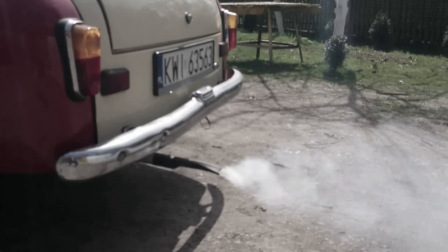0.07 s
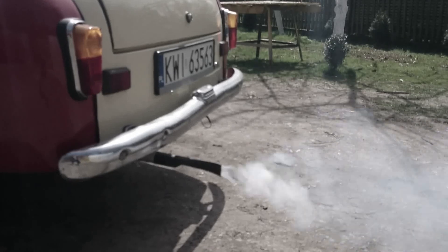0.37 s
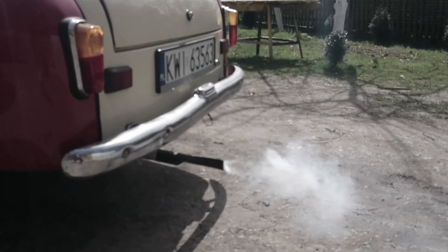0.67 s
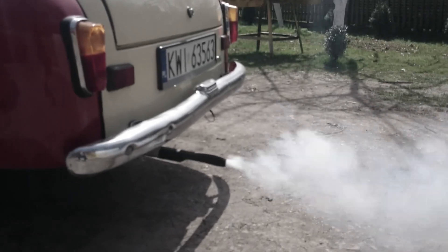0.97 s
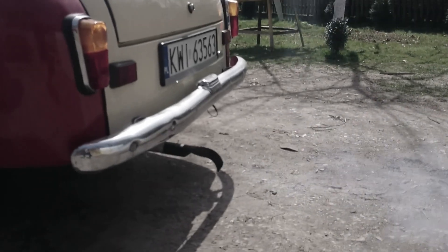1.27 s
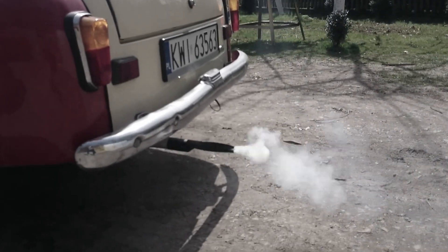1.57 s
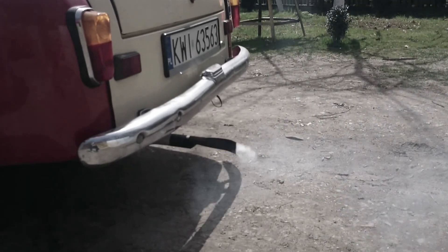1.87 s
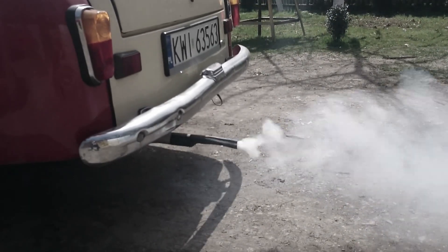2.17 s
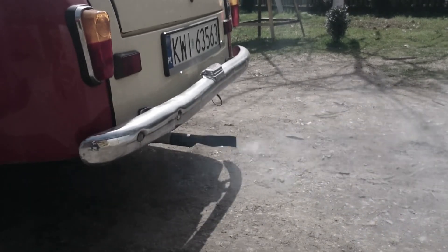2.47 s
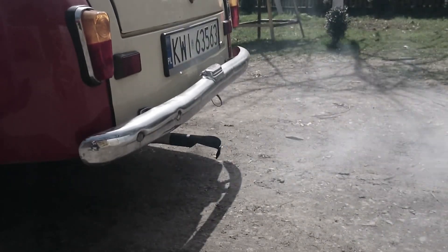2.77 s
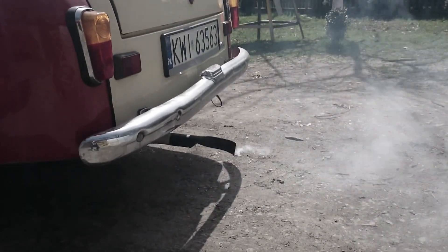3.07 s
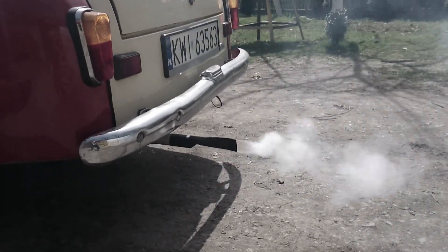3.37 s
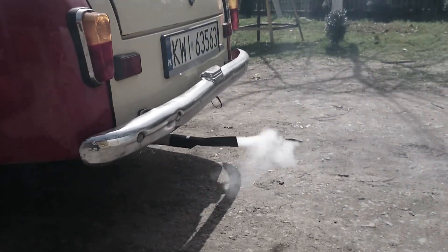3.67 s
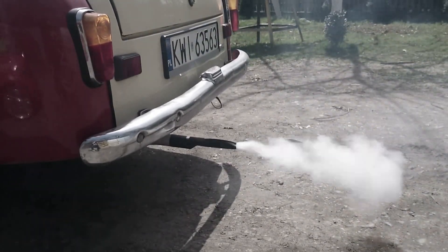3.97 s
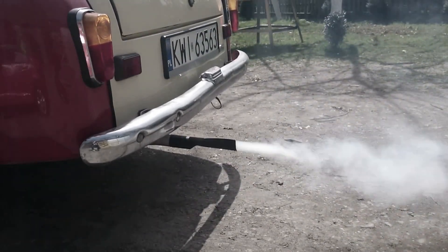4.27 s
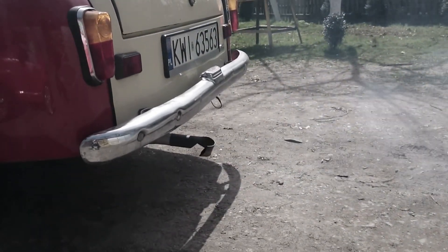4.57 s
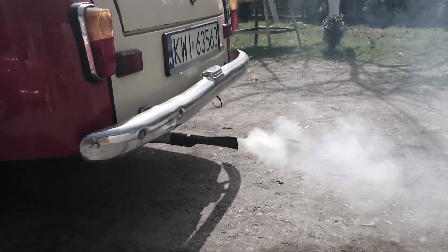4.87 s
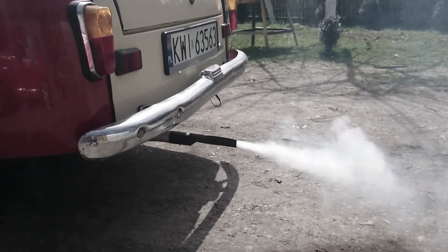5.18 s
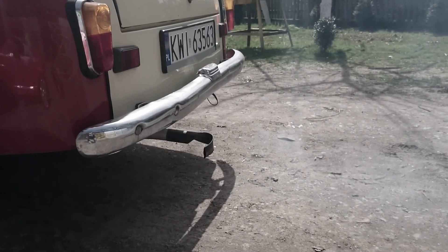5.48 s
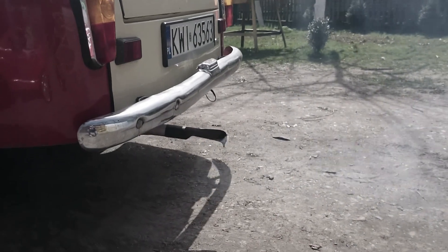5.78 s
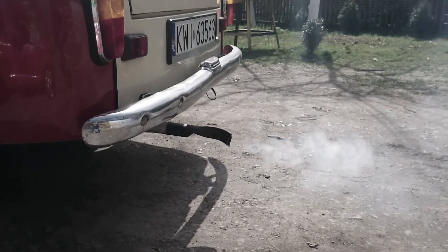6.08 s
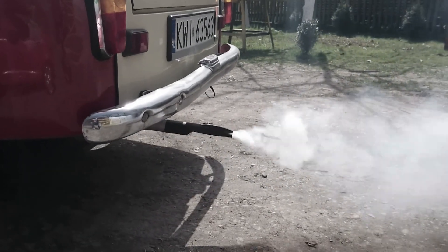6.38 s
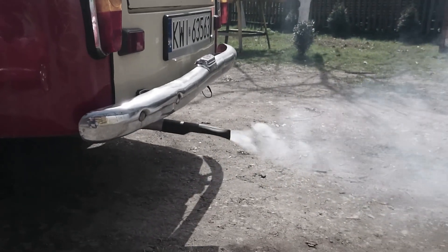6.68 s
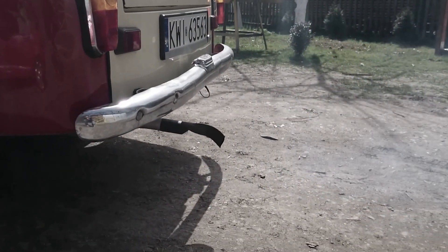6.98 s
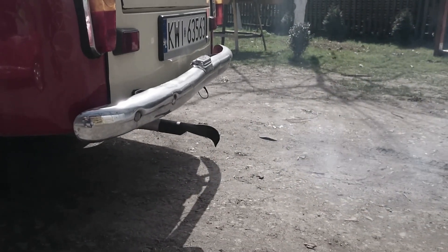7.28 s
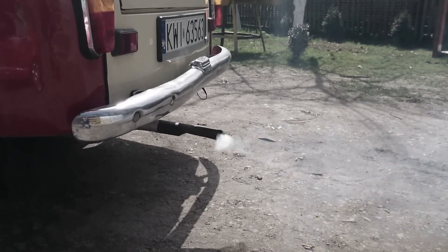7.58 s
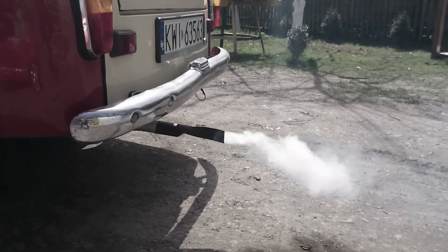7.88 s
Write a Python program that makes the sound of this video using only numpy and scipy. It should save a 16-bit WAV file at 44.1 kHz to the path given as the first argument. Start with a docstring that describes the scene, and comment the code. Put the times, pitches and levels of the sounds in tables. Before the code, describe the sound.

Close to a tailpipe outdoors, exhaust barks and splutters through a loose rubber tube that flaps, cracks and squeaks. Underneath, an old car engine drones and rattles, speeding up slightly five times and sagging after each. The sputtering comes in irregular clusters, thickest in the middle, where a breathy whistle glides upward, and again near the end with a short howl. A light wind rumbles on the microphone, and there is almost no echo.

```python
"""In a yard, an old car runs with a soft rubber tube pushed over its tailpipe; the sound fades in.
Each irregular firing drives a pulse of gas through the tube: pipe and tube resonate with a thump and
a bark, the jet hisses, and the rubber slaps, crackles and squeaks. The throttle is blipped five times
and the engine coasts down in between, its harmonic drone and rattle following the crank speed.
A hoot, three howls and a rising whistle join in, over the low rumble of a breeze."""
import sys
import numpy as np
from scipy import signal
from scipy.fft import rfft, irfft
from scipy.io import wavfile

SR = 44100
rng = np.random.default_rng(int(sys.argv[2]) if len(sys.argv) > 2 else 0)


def master_out(mix):
    """Clip the mix to full scale and print it as 16-bit PCM to the path in sys.argv[1]."""
    frames = np.transpose(np.atleast_2d(mix))
    ceiling = np.clip(frames, -1, 1)
    pcm = np.round(ceiling * 32767).astype(np.int16)
    wavfile.write(sys.argv[1], SR, pcm)


N = 350154
TIME, BINS = np.arange(N) / SR, np.fft.rfftfreq(N, 1 / SR)

# firings that blow the tube open until its loose end claps:
# (clap time [s], puff length [s], puff level [dB], clap level [dB])
FIRINGS = [(0.904, 0.034, -22, -5.5), (1.002, 0.054, -22.5, -2), (1.1043, 0.12, -24.5, -6.5),
           (1.152, 0.02, -17.5, 0), (1.1983, 0.02, -20.5, -5), (1.252, 0.04, -24.5, -11),
           (1.615, 0.068, -31, -49), (1.6855, 0.036, -22, -24), (1.855, 0.031, -30.5, -19),
           (2.152, 0.12, -24.5, -31), (2.2082, 0.062, -16.5, -6.5), (2.255, 0.035, -15, -5),
           (2.2768, 0.014, -34, 0), (2.38, 0.042, -23.5, -54), (2.421, 0.02, -26, -19),
           (2.5408, 0.053, -29, -14.5), (2.6697, 0.012, -33, -18.5), (2.76, 0.034, -34, -33),
           (3.047, 0.03, -27.5, -47), (3.1004, 0.014, -22, -16), (3.1566, 0.044, -22, -10),
           (3.482, 0.018, -26.5, -18), (3.608, 0.049, -34.5, -20), (3.653, 0.067, -28.5, -23),
           (3.794, 0.027, -33.5, -11), (3.9728, 0.035, -45, -18), (4.1148, 0.047, -18.5, -9),
           (4.14, 0.072, -18.5, -13), (4.18, 0.12, -19, -2), (4.235, 0.056, -17.5, -19),
           (4.2805, 0.025, -16, -2.5), (4.3161, 0.01, -31, -4.5), (4.447, 0.052, -32.5, -29),
           (4.5105, 0.052, -17, -4.5), (4.545, .035, -21.5, -19), (4.68, 0.014, -31, -17),
           (4.829, 0.069, -21.5, -34), (4.895, 0.062, -26, -48), (4.9326, .04, -25, -23),
           (4.9948, 0.064, -16.5, -11), (5.057, 0.076, -22, -18.5), (5.1332, .03, -20.5, -13),
           (5.1907, 0.076, -21, -16), (5.262, 0.063, -23, -33), (5.3014, 0.094, -21.5, -33),
           (5.383, 0.04, -17.5, -18), (5.4484, 0.019, -20, -13.5), (5.533, 0.019, -23, -41),
           (5.726, 0.04, -35, -50), (5.916, 0.022, -24.5, -38), (5.965, 0.014, -23.5, -21),
           (6.292, 0.014, -28, -24), (6.375, .033, -21, -10.5), (6.4343, 0.042, -25, -18.5),
           (6.469, 0.087, -18.5, -27), (6.49, .015, -31, -6), (6.5454, 0.051, -17, -28),
           (6.608, 0.07, -12, -13), (6.6638, 0.037, -15.5, -8.5), (6.6973, 0.022, -17.5, -7.5),
           (6.751, 0.07, -18, -8.5), (6.841, 0.0099, -22, -14), (6.9027, 0.044, -26.5, -11.5),
           (6.9725, 0.029, -26.5, -12), (7.157, 0.031, -21.5, -24), (7.272, 0.046, -24.5, -68),
           (7.461, .03, -29.5, -26), (7.562, 0.029, -22.5, -23), (7.7032, 0.034, -20, -19)]
# sharp pops that ring the tube: (time [s], level [dB])
POP_EVENTS = [(2.147, -12), (2.276, 2), (2.37, -20), (3.098, -10), (3.152, -2), (4.113, -13), (4.315, 1),
              (4.832, -13), (5.132, -15), (5.383, -11), (5.445, -12), (5.986, -7), (6.356, -3.5),
              (6.9, -23), (7.178, -5.5), (7.694, -9)]
# gas squeezing between the rubber lips, plus a short knock near 2 kHz at 7.18 s, played the same way: (time
# [s], starting pitch [Hz], level [dB])
SQUEAK_EVENTS = [(1.293, 2980, -2.5), (1.319, 3250, -11.5), (2.5609, 3000, -11), (3.624, 3210, -11.5),
                 (4.43, 3540, -17.5), (4.62, 3200, -18), (4.678, 2670, -26), (5.132, 3500, -9),
                 (5.987, 2800, -14), (6.306, 3180, -22), (7.178, 2070, -11.5)]
# howls of the pipe at wide throttle: (start [s], end [s], pitch [Hz], level [dB])
HOWL_EVENTS = [(2.168, 2.35, 322, -29), (4.07, 4.34, 375, -19), (6.57, 6.937, 368.3, -19.5)]
# course of the whistle: (time [s], pitch [Hz], level [dB])
WHISTLE_GLIDE = [(3.7, 701.7, -47), (3.85, 791.6, -30.5), (3.95, 905, -26.5), (4.05, 958, -23.5),
                 (4.2, 983, -21.5), (4.35, 1072, -34), (4.48, 1180, -25), (4.6, 1218, -50)]
# resonances of the exhaust pipe and the inflated tube: (frequency [Hz], bandwidth [Hz], level [dB])
PIPE_MODES = [(172, 18, -4), (444, 20, 5), (678, 35, 1)]
TUBE_MODES = [(1254, 220, 5.5), (1590, 130, -2), (1722, 55, 10.5), (1812, 63, -0.5)]
# throttle blips: (start [s], end [s], crank speed reached [Hz], deceleration afterwards [Hz/s])
THROTTLE_BLIPS = [(1.0, 1.27, 59.22, 6.97), (2.07, 2.25, 55.3, 7.39), (4.09, 4.42, 51.7, 7.0),
                  (4.88, 5.31, 56.61, 7.77), (6.51, 6.83, 59.77, 6.04)]
# harmonics 1, 2, 3, ... of the crank speed: (relative level [dB])
ENGINE_HARMONICS = [0, 1.5, -2.5, -9.5, -10, -4.5, -9.5, -9.5, -12, -12, -17.5, -14, -16, -11, -17, -13]
# strength of the rattle at CRUISE_HZ: (time [s], level [dB])
RATTLE_COURSE = [(1.3, -29), (3.5, -27.5), (3.8, -23), (5.5, -25.5), (6.2, -27), (7.4, -25.5), (7.9, -27.5)]
# gusts of the breeze: (peak time [s], half length [s], level [dB])
BREEZE_GUSTS = [(2.55, 0.2, -29.5), (3.06, 0.088, -25), (4.968, 0.16, -30.5), (6.203, 0.14, -48),
                (7.402, 0.38, -38)]
# spectral shapes of the sources: (frequency [Hz], relative spectral density [dB])
THUMP_SPECTRUM = [(20, -22), (40, -10), (65, 1), (110, 1), (170, -5), (240, -9), (400, -11), (600, -20),
                  (750, -16), (1100, -35), (3000, -70)]
BARK_SPECTRUM = [(120, -26), (230, -7.5), (300, 4.5), (410, 5.5), (570, -13), (750, 0), (1000, -4.5),
                 (1300, 0.5), (2000, 2.5), (2600, -3.5), (3600, -5.5), (4500, -26.5), (8000, -14.5),
                 (15000, -46.5)]
HISS_SPECTRUM = [(800, -26), (2000, 7), (3400, -5), (4400, 2.5), (6200, 2.5), (8000, 4.5), (9600, 2.5),
                 (11000, -7.5), (13500, -4), (16000, -17)]
CRACK_SPECTRUM = [(300, -25), (900, -17), (1700, -10), (2500, -1.5), (3500, 1), (4500, -6.5), (6200, -3),
                  (9500, -5.5), (11000, -18), (16000, -20)]
RUMBLE_SPECTRUM = [(20, -32), (40, -12), (62, -11.5), (110, -3.5), (170, -3), (230, -20), (340, -13.5),
                   (440, -10), (580, -14.5), (730, -7), (950, -17), (1500, -48)]
RATTLE_SPECTRUM = [(300, -22.5), (600, -19.5), (760, -8), (1000, 0), (1250, 1.5), (1450, 4), (1700, 6.5),
                   (2100, 0.5), (2700, -1), (3400, -9), (4400, -12), (6500, -13.5), (9300, -16.5),
                   (11000, -29), (15500, -40)]
BREEZE_SPECTRUM = [(15, -25), (35, -16.5), (65, 8.5), (110, 3), (200, -3.5), (400, -28.5), (1200, -53)]
# share of the sound scattered by the yard: (frequency [Hz], gain [dB])
YARD_SCATTER = [(60, -32), (500, -26), (800, -19), (1400, -13), (3000, -10), (15000, -10)]
# gain at the centre of a treble band: (time [s], gain [dB])
PRESENCE_GAIN = [(1, -4), (4.4, -6.5), (4.9, -1), (7.5, 5)]
# left microphone relative to the right: (frequency [Hz], level difference [dB])
MIC_BALANCE = [(60, 0.5), (92, -3.5), (140, -2), (210, -3), (330, -5.5), (500, -6), (770, -7), (1170, -10),
               (1790, -14.5), (2740, -10), (4190, -10), (6410, 9.5), (9810, 10.5), (15000, -21)]
# right microphone behind the left, apart from its polarity: (frequency [Hz], phase lag [rad])
MIC_PHASE_LAG = [(40, -.27), (130, -.2), (280, 0), (440, .45), (600, .7), (800, 1.), (1250, .55),
                 (1700, 1.7), (2400, .9), (4000, 3.7), (7000, 10), (15000, 27)]

START_HZ, CRUISE_HZ = 56.34, 53  # crank speed before the first blip; reference speed for engine levels


def puffs(turns, flutter_db=3.5, spit_db=3):
    """Pulsed turbulent flow thumps in the pipe, barks in the fluttering tube and hisses out as a jet."""
    flutter = unit(amp(flutter_db * waver(127))) * strokes(turns, decay=3.5)
    spit = unit(amp(spit_db * waver(1000)))
    pipe = turbulence(0.22) * flow(puff_share=0.097, clap_share=-0.097, swell=0.086, fall_s=0.0085)
    tube = turbulence(0.65) * flow(puff_share=0.93, clap_share=0, swell=0.15, fall_s=0.027)
    jet = turbulence(1.2) * flow(puff_share=0.37, clap_share=0.22, swell=0.33, fall_s=0.017)
    thump = colour(pipe, THUMP_SPECTRUM, PIPE_MODES)
    bark = colour(tube * flutter, BARK_SPECTRUM, TUBE_MODES)
    hiss = colour(jet * flutter * spit, HISS_SPECTRUM)
    thump_db = -16.5 - throttle()  # weaker while the throttle holds the tube open
    return amp(thump_db) * thump + amp(2) * bark + amp(-13.5) * hiss


def flow(puff_share, clap_share, swell, fall_s, hold=0.6, lead=0.35):
    """Incoherent puffs add in power; each swells, holds and collapses, starting ahead of its clap."""
    power, t = np.zeros(N), np.arange(SR // 4) / SR
    for s, length, puff_db, clap_db in FIRINGS:
        # swell, hold and lead are fractions of the puff's length
        opening = np.minimum(t / (swell * length), 1)
        collapse = np.exp(-np.maximum(t - hold * length, 0) / fall_s)
        gain = amp(puff_share * puff_db + clap_share * clap_db)
        add(power, s - lead * length, (gain * opening * collapse) ** 2)
    return np.sqrt(power)


def slaps(rebound_s=0.028, rebound_db=-16):
    """Impacts of the rubber radiate a broadband crack and a damped shiver; each rebounds more softly."""
    claps = [(s, db) for s, _, _, db in FIRINGS]
    claps += [(s + rebound_s * (1 + 0.254 * rng.uniform(-1.05, 1)), db + rebound_db) for s, db in claps]
    crack = bursts(claps, rise_s=0.0002, decay_s=0.0011)
    shiver = amp(-19) * bursts(claps, rise_s=0.0013, decay_s=0.0074)
    return amp(5) * colour((crack + shiver) * turbulence(1), CRACK_SPECTRUM)


def pops():
    """Impulse excitation: a sudden firing sets the tube's modes ringing."""
    blows = bursts(POP_EVENTS, rise_s=0.0006, decay_s=0.00091) * turbulence(0.59)
    return amp(7) * colour(blows, BARK_SPECTRUM, TUBE_MODES)


def crackle(per_s=110, spread_db=4, decay_s=0.0007):
    """The fluttering lips touch as a Poisson process, making small cracks that scale with the flow."""
    touches = (rng.random(N) < per_s / SR) * amp(spread_db * np.clip(rng.standard_normal(N), -2, 2))
    cracks = signal.lfilter([1], [1, -np.exp(-1 / (decay_s * SR))], touches)
    gas = flow(puff_share=1, clap_share=0, swell=0.19, fall_s=0.0075)
    return amp(7) * colour(cracks * gas * turbulence(1), CRACK_SPECTRUM)


def squeaks(peak_s=0.00054, glide=4.0, rasp=0.37):
    """Flow-induced vibration: the lips buzz roughly for a few milliseconds at a rising pitch."""
    out, t = np.zeros(N), np.arange(SR // 50) / SR
    envelope = t / peak_s * np.exp(1 - t / peak_s)
    for s, hz, db in SQUEAK_EVENTS:
        phase = 2 * np.pi * hz * t * (1 + glide * t)
        buzz = np.sin(phase) + amp(-13) * np.sin(2 * phase) + rasp * rng.standard_normal(len(t))
        add(out, s, 2 * amp(db) * envelope * buzz)
    return out


def hoot(hz, resonance_hz=444, reach_hz=15, pull=0.75, build_s=0.043):
    """Forced resonance: the tube hoots as the ninth engine harmonic sweeps past; puffs blow it louder."""
    detuning = (9 * hz - resonance_hz) / reach_hz
    pitch = resonance_hz + pull * reach_hz * np.tanh(detuning)
    note = np.sin(2 * np.pi * np.cumsum(pitch) / SR) + 0.7 * narrowband(resonance_hz * TIME, 14)
    gas = amp(-24) + amp(3) * flow(puff_share=0.77, clap_share=0, swell=0.1, fall_s=0.015)
    return lag(gas / (1 + detuning ** 2) ** 2, build_s) * note


def howls(width_hz=65):
    """A broad, low resonance of the pipe swells and fades during three of the throttle blips."""
    out = np.zeros(N)
    for start, end, hz, db in HOWL_EVENTS:
        arch = np.sin(np.pi * np.clip((TIME - start) / (end - start), 0, 1))
        out += amp(db) * arch * narrowband(hz * TIME, width_hz)
    return out


def whistle(width_hz=85, overtone_db=-5.5):
    """Narrow noise bands in harmonic ratio are heard as one breathy pitch, gliding upward."""
    hz, db = curves(WHISTLE_GLIDE)
    cycles = np.cumsum(hz) / SR
    bands = sum(amp((k - 1) * overtone_db) * narrowband(k * cycles, k * width_hz) for k in (1, 2, 3))
    sounding = (TIME > WHISTLE_GLIDE[0][0]) & (TIME < WHISTLE_GLIDE[-1][0])
    return sounding * amp(db) * bands


def drone(hz, turns, unsteady=0.45, db_per_hz=0.23):
    """Source and filter: engine harmonics swell as they cross the pipe's modes, over turbulent rumble."""
    harmonics = np.zeros(N)
    for k, db in enumerate(ENGINE_HARMONICS, 1):
        gain = amp(db) * resonance(PIPE_MODES, k * hz) * (1 + unsteady * waver(5.4))
        harmonics += gain * np.cos(2 * np.pi * (k * turns + rng.random()))
    rumble = colour(strokes(turns, decay=0.52) * turbulence(0.3), RUMBLE_SPECTRUM, PIPE_MODES)
    level = amp(-22.5 + db_per_hz * (hz - CRUISE_HZ))
    return level * (amp(1) * unit(harmonics) + amp(-5) * rumble)


def rattle(hz, turns, throb=0.082, db_per_hz=0.4):
    """The crank modulates mechanical noise; the part that repeats each turn whines in high harmonics."""
    noise = turbulence(1) * strokes(turns, decay=8.0) * (1 + throb * np.cos(2 * np.pi * turns))
    one_turn = rng.standard_normal(160)
    periodic = np.interp(turns % 1, np.linspace(0, 1, len(one_turn)), one_turn)
    whine = unit(colour(periodic, RATTLE_SPECTRUM))
    level = amp(curves(RATTLE_COURSE)[0] + db_per_hz * (hz - CRUISE_HZ))
    return level * (colour(noise, RATTLE_SPECTRUM) + amp(-8) * whine)


def crankshaft(jitter=0.00383):
    """Crank speed [Hz] climbs in each blip and sags after it; its integral is the angle [turns]."""
    points, speed = [], START_HZ
    coast_ends = [blip[0] for blip in THROTTLE_BLIPS[1:]] + [N / SR]
    for (start, end, top_hz, sag), until in zip(THROTTLE_BLIPS, coast_ends):
        points += [(start, speed), (end, top_hz)]
        speed = top_hz - sag * (until - end)
    hz = curves(points + [(N / SR, speed)])[0] * (1 + jitter * waver(14))
    return hz, np.cumsum(hz) / SR


def strokes(turns, decay):
    """A pulse train of three exhaust strokes a turn; each dies away, with decay in stroke periods."""
    return unit(np.exp(-(3 * turns % 1) / decay))


def throttle(early_s=0.13, inertia_s=0.02):
    """Inertia smooths the throttle between 0 (coasting) and 1; it opens before the speed climbs."""
    pressed = sum(1.0 * ((TIME > start - early_s) & (TIME < end)) for start, end, *_ in THROTTLE_BLIPS)
    return lag(pressed, inertia_s)


def breeze(floor_db=-39.5, lumps_db=3):
    """Eddies make a lumpy low rumble, uncorrelated at the two microphones, that swells in gusts."""
    eddies = unit(amp(lumps_db * waver(33))) * rng.standard_normal((2, N))
    gusts = sum(amp(db) * np.exp(-((TIME - s) / half) ** 2) for s, half, db in BREEZE_GUSTS)
    return colour(eddies * (amp(floor_db) + gusts), BREEZE_SPECTRUM)


def yard(x, t60_s=0.058, ground_gain=0.036, ground_s=0.0021):
    """Reflection: the ground returns the treble once; car body and fence scatter a short tail."""
    t = np.arange(SR // 3) / SR
    echoes = rng.standard_normal((2, len(t))) * (rng.random((2, len(t))) < 0.1)
    echoes *= amp(-60 * t / t60_s) * (t > 0.002)
    echoes /= np.linalg.norm(echoes, axis=1, keepdims=True)
    tail = rfft(echoes, N) * amp(read(YARD_SCATTER, BINS))
    bounce = ground_gain * BINS / (BINS + 1500) * np.exp(-2j * np.pi * BINS * ground_s)
    response = irfft(1 + bounce + tail, N)[:, :len(t)]
    return signal.oaconvolve(x, response, axes=1)[:, :N]


def presence(x, centre_hz=3960, width_hz=1040):
    """Time-varying filtering leaves a band of the treble dull at first and brighter later."""
    band = irfft(rfft(x) * np.exp(-((BINS - centre_hz) / width_hz) ** 2), N)
    return x + (amp(curves(PRESENCE_GAIN)[0]) - 1) * band


def turbulence(apart):
    """Partial coherence: noise from a wide source reaches two microphones partly unrelated."""
    shared, left, right = rng.standard_normal((3, N))
    return (shared + apart * np.array([left, right])) / np.hypot(1, apart)


def waver(hz):
    """Low-passed noise of rms 1 fluctuates up to about the given rate."""
    return unit(irfft(rfft(rng.standard_normal(N)) * np.exp(-(BINS / hz) ** 2), N))


def narrowband(cycles, width_hz):
    """Random modulation spreads a tone into a narrow band of noise."""
    return (np.exp(2j * np.pi * cycles) * (waver(width_hz) + 1j * waver(width_hz))).real


def bursts(rows, rise_s, decay_s):
    """Exponentially damped envelopes of blows given as (time [s], level [dB])."""
    out, t = np.zeros(N), np.arange(SR // 25) / SR
    for s, db in rows:
        add(out, s, amp(db) * (1 - np.exp(-t / rise_s)) * np.exp(-t / decay_s))
    return out


def resonance(modes, hz):
    """Gain of resonance peaks standing on a flat response."""
    return 1 + sum(amp(db) / np.hypot(1, 2 * (hz - f) / width) ** 2 for f, width, db in modes)


def colour(x, spectrum, modes=()):
    """A minimum-phase filter of unit energy imposes a spectrum and its resonances."""
    hz = abs(np.fft.fftfreq(8192, 1 / SR))
    log_gain = np.log(amp(read(spectrum, hz)) * resonance(modes, hz))
    taps = np.fft.ifft(np.exp(np.conj(signal.hilbert(log_gain)))).real[:len(hz) // 2]
    return signal.oaconvolve(np.atleast_2d(x), taps[None] / np.linalg.norm(taps), axes=1)[:, :N]


def lag(x, seconds):
    """First-order relaxation toward a control signal."""
    keep = np.exp(-1 / (seconds * SR))
    return signal.lfilter([1 - keep], [1, -keep], x)


def amp(db):
    """Decibels to amplitude ratio."""
    return 10 ** (np.asarray(db) / 20)


def unit(x):
    """Normalisation to rms 1."""
    return x / np.sqrt(np.mean(x ** 2) + 1e-20)


def curves(rows):
    """Linear interpolation in time of each column after the first."""
    s, *columns = np.transpose(rows)
    return [np.interp(TIME, s, c) for c in columns]


def read(points, hz):
    """Interpolation on a log-frequency axis."""
    f, value = np.transpose(points)
    return np.interp(np.log(hz + 1), np.log(f + 1), value)


def add(mix, s, sound):
    """Superposition of a sound at time s."""
    part = mix[round(s * SR):][:len(sound)]
    part += sound[:len(part)]


def scene(silence_s=0.75, fade_s=0.64):
    """Engine and tube superpose at one spot in the yard; with the breeze they fade in from silence."""
    hz, turns = crankshaft()
    engine = drone(hz, turns) + rattle(hz, turns)
    tube = puffs(turns) + pops() + slaps() + crackle() + squeaks() + hoot(hz) + howls() + whistle()
    fade = np.clip((TIME - silence_s) / fade_s, 0, 1) ** 1.44
    return fade * (presence(yard(engine + tube)) + breeze())


def record(dry, ceiling=1.25, edge_hz=16000):
    """Transduction by two unequal microphones of opposite polarity, softly saturated and band-limited."""
    balance = amp(read(MIC_BALANCE, BINS))
    right = -np.exp(-1j * read(MIC_PHASE_LAG, BINS))
    responses = np.array([balance, right]) * np.sqrt(2 / (1 + balance ** 2))  # constant total power
    taps = np.roll(irfft(responses, N), 1024, axis=1)[:, :2049]
    heard = ceiling * np.tanh(signal.oaconvolve(dry, taps, "same", axes=1) / ceiling)
    lowpass = signal.firwin(255, edge_hz, window=("kaiser", 9), fs=SR)
    return signal.oaconvolve(heard, lowpass[None], "same")


dry = scene()
out = record(dry)
master_out(out)
```